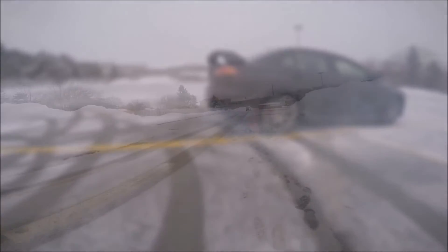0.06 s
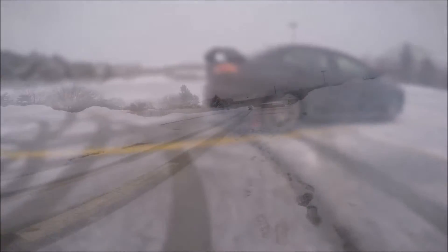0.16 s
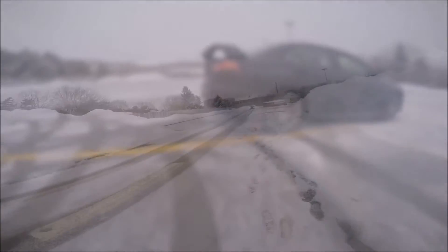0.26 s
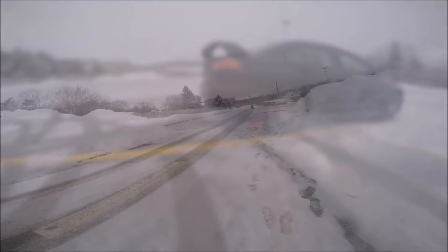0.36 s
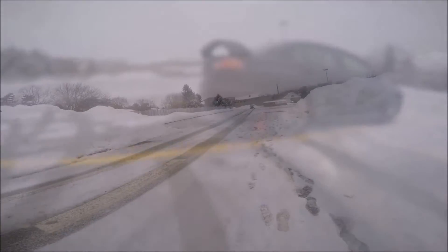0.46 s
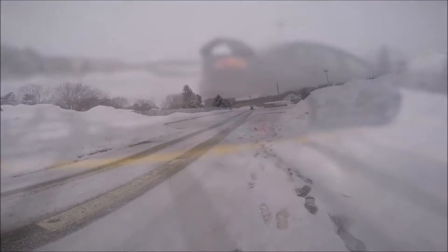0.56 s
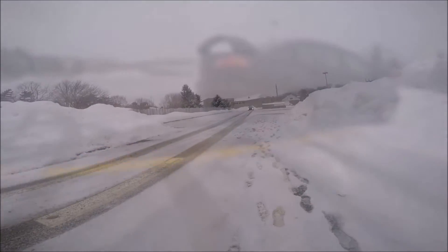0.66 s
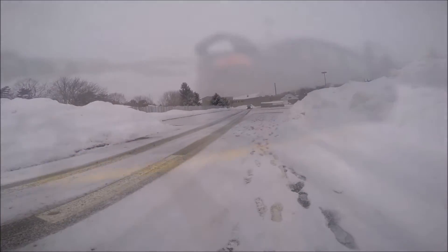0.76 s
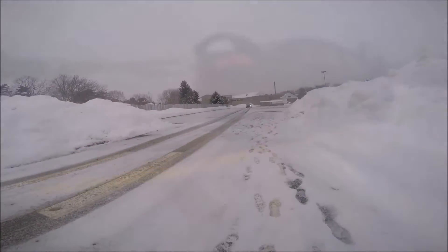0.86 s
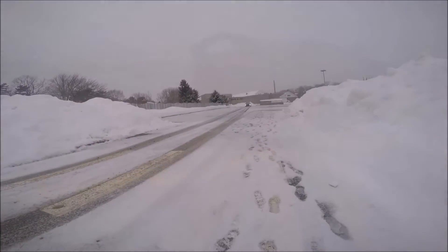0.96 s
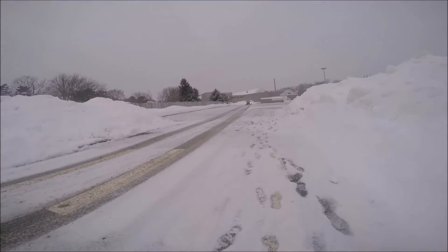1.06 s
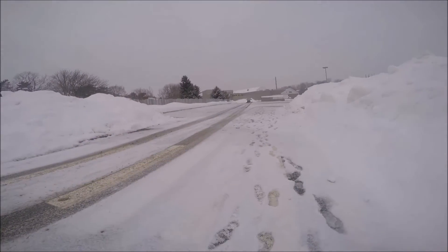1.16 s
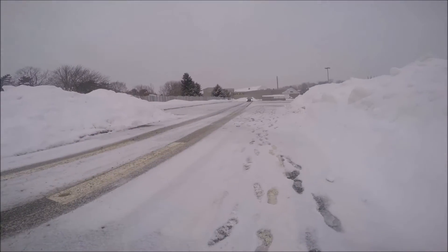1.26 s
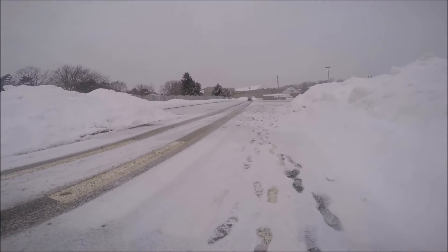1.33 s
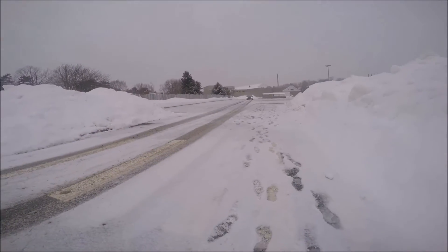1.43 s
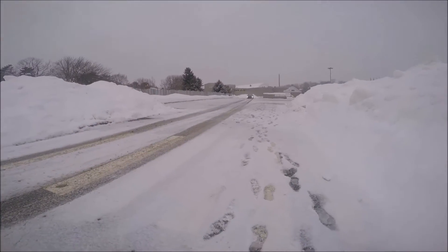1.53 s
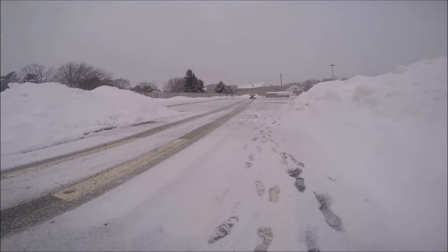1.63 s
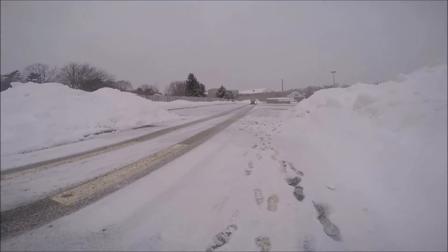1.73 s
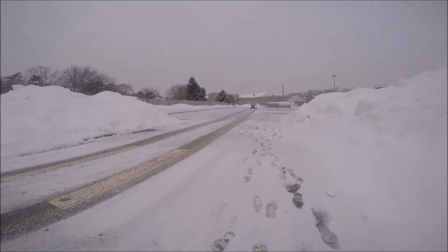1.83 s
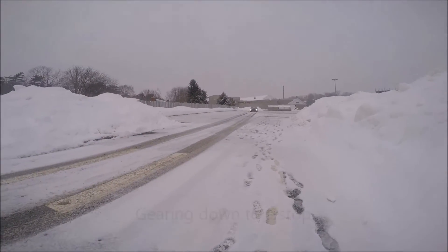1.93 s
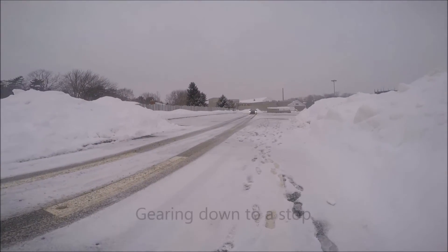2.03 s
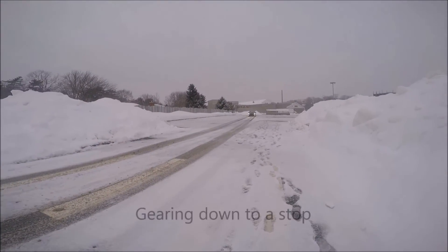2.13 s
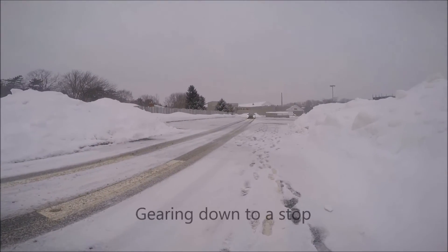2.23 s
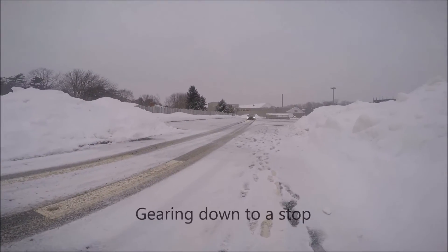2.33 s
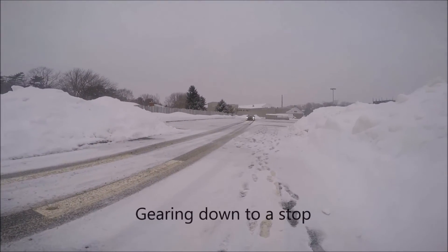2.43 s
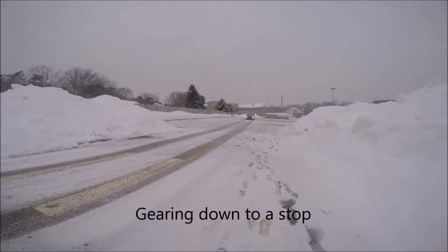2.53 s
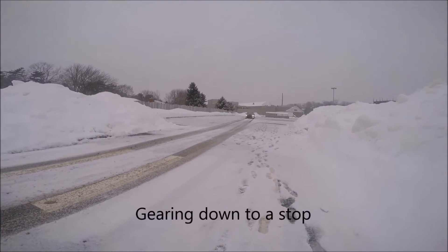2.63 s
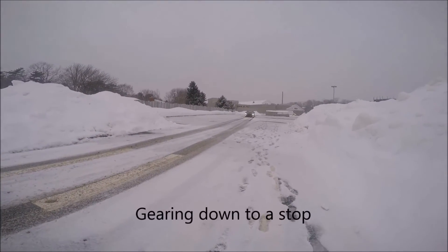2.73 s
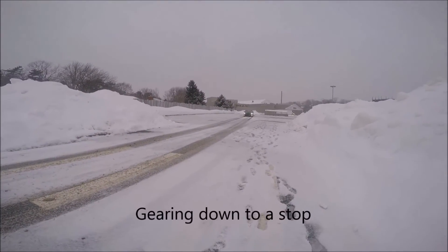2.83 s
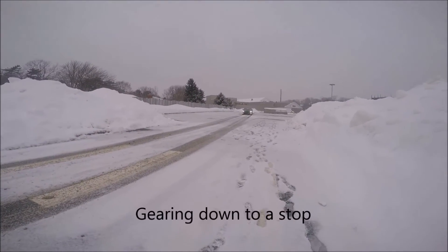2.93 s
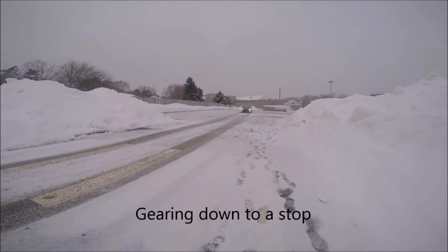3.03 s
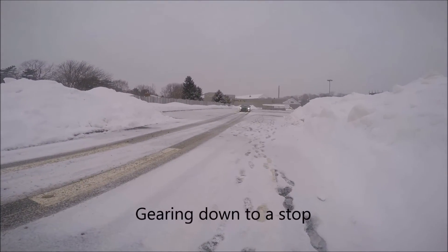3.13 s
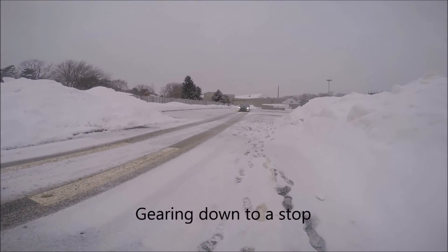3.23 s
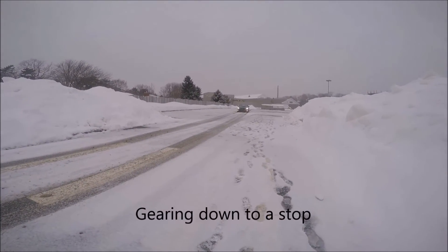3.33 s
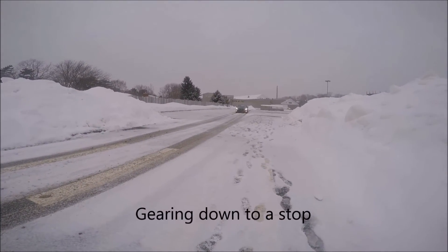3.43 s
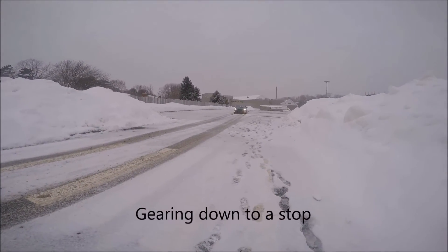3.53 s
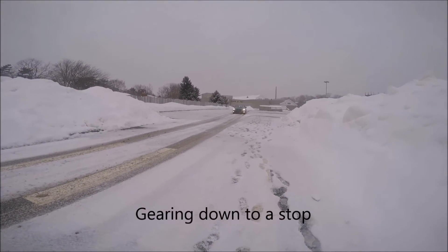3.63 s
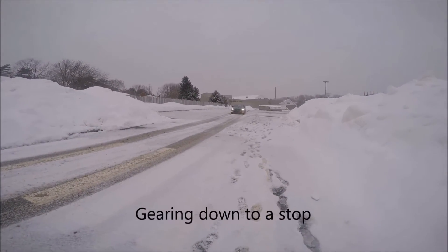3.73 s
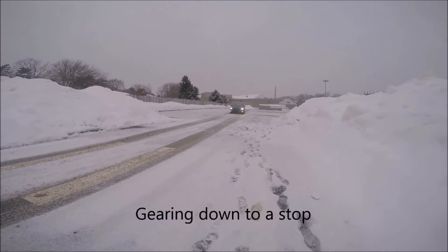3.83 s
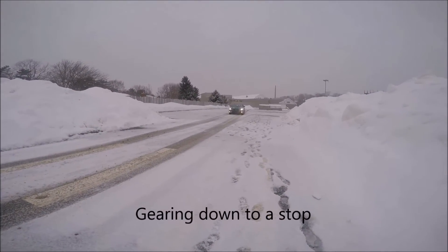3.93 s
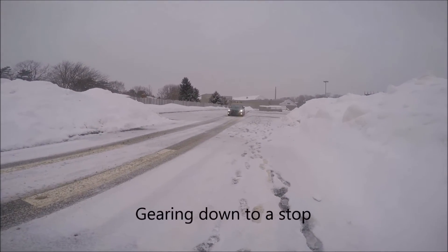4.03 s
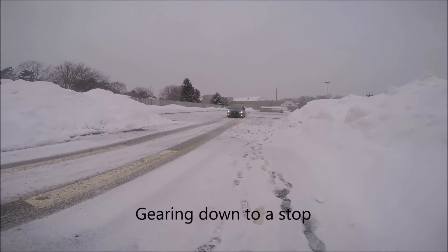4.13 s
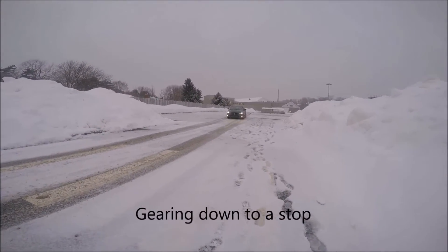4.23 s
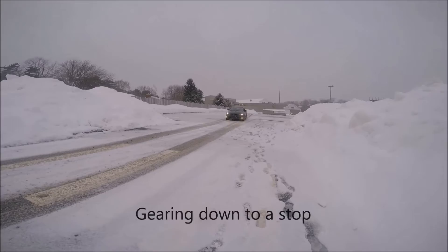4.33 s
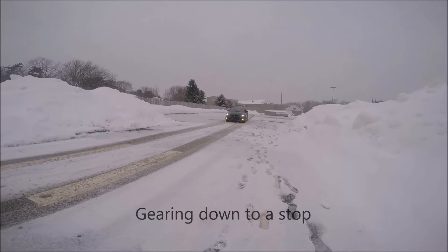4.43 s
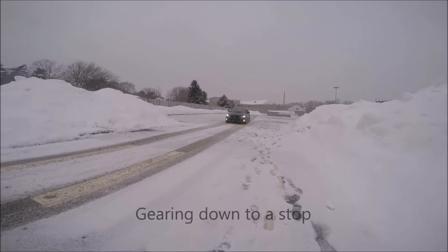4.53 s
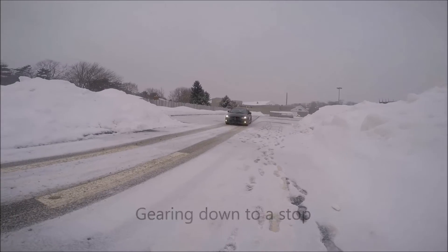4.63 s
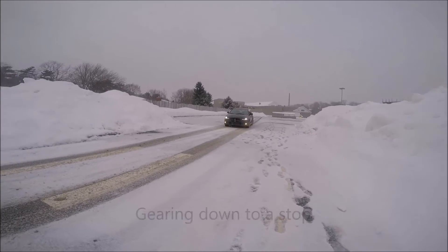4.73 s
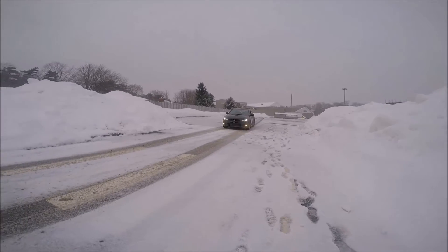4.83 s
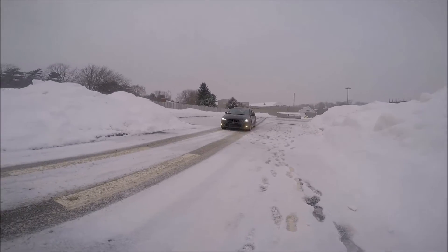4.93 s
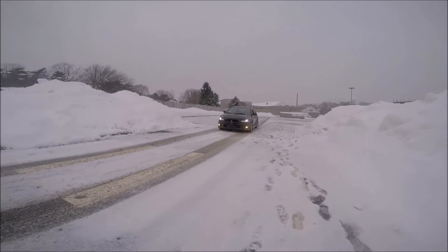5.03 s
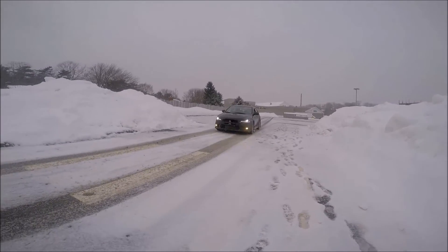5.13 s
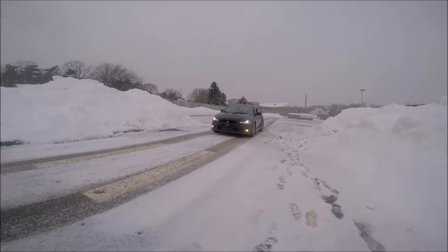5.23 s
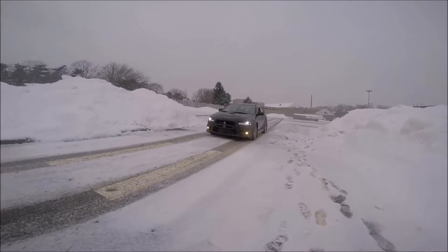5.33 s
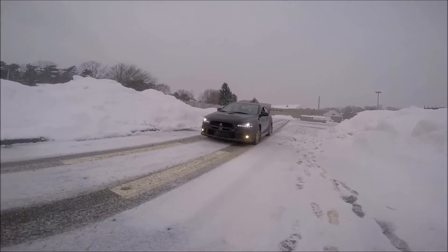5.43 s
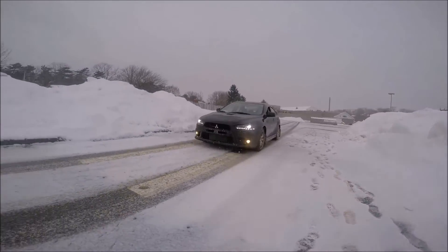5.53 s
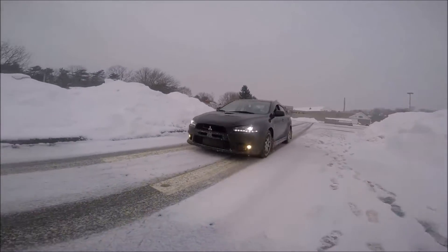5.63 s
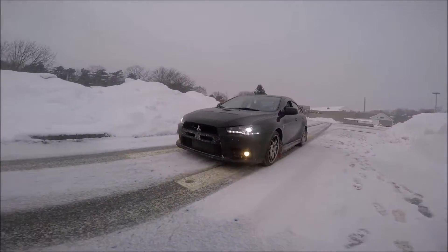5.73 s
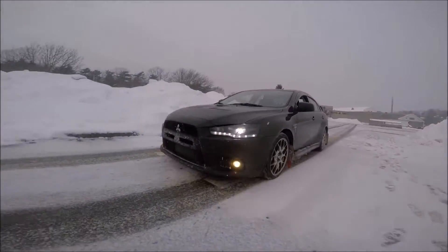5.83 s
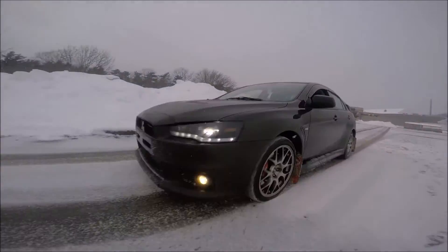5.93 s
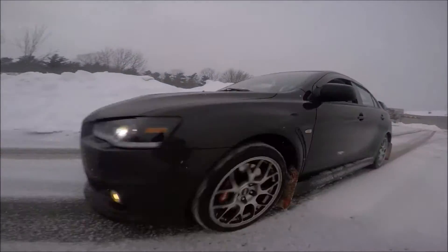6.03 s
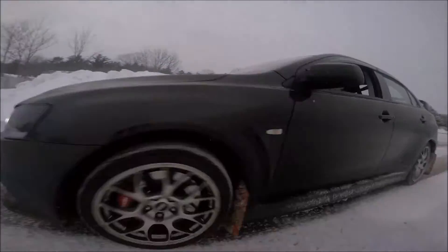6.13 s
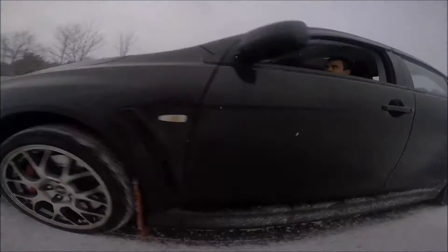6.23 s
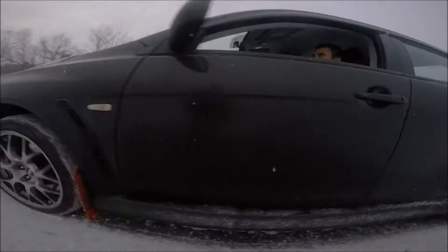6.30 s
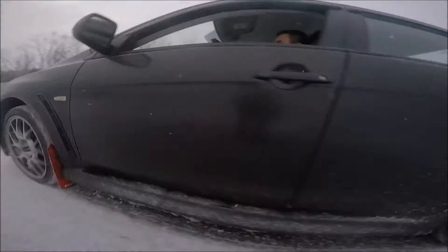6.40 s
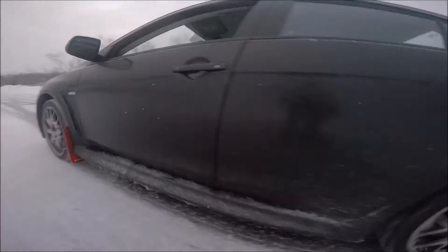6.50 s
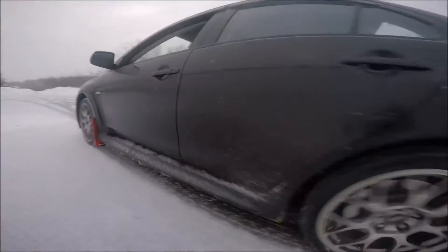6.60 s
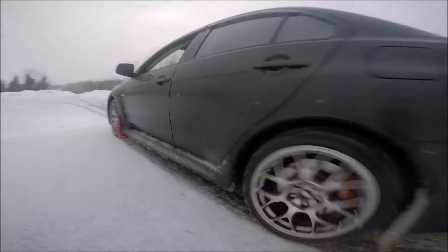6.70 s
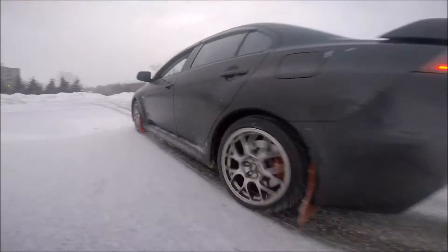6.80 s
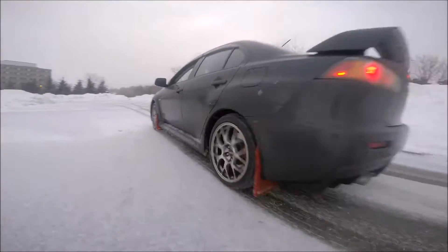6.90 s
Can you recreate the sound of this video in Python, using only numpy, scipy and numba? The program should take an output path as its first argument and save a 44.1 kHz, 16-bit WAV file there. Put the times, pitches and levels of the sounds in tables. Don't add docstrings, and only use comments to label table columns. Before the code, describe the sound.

From 0 to 1.08 s a four-cylinder car booms around a snowy lot, its low, lumpy exhaust rising and dipping while wind rumbles against the camera housing, with scattered dry ticks and a soft thump just before the cut. The next scene is quieter: distant exhaust drops in pitch until about 1.8 s amid clustered ice clicks, dull knocks and wind thumps. Revs climb from 2.4 s to a ringing peak near 3, then fall to a steady low boom until 4.4. A sharper blip peaks around 4.7 s, with strong wind thumps to 5.2, then the pitch descends. Slush and airy hiss swell from 4.5 s, strongest around 5.8-6.4 as the car passes close. A firm housing knock lands at 6.2 s; tyre noise then fades while deep exhaust slows and grows lumpier, with small ringing ticks near 6.8 s.

```python
import sys
import numpy as np
from scipy import signal
from scipy.io import wavfile
from scipy.ndimage import uniform_filter1d
from numba import njit

SR = 44100
rng = np.random.default_rng(int(sys.argv[2]) if len(sys.argv) > 2 else 0)


def log_audio(samples):
    frames = np.atleast_2d(samples).T
    limited = np.clip(frames, -1, 1)
    pcm = np.round(limited * 32767).astype(np.int16)
    wavfile.write(sys.argv[1], SR, pcm)


def volts(x):
    e = np.asarray(x, float) / 20
    return 10 ** e


N = 306936
TIME = np.arange(N) / SR

# (time [s], gust level [dB], sharpness [dB/octave])
GUSTS = [(0, -24.5, 3.5), (.35, -25.5, 1.5), (.45, -18.5, 1), (.55, -23.5, 2.5), (.88, -24, 0),
         (.93, -18, 1), (1.0, -22.5, 2), (1.05, -16, 1), (1.075, -24, 1.5), (1.09, -26.5, -8),
         (1.17, -28.5, -2), (1.36, -29, 6), (1.43, -33, 1.5), (1.48, -17, -0.5), (1.59, -31.5, 2.5),
         (1.62, -22, 1.5), (1.72, -24.5, 0.5), (1.78, -17, -0.5), (1.82, -27, -1), (1.87, -26.5, 0.5),
         (2.04, -33.5, 2.5), (2.11, -20.5, 1.5), (2.17, -31, -2), (2.21, -24.5, 1), (2.29, -31.5, 0.5),
         (2.37, -27.5, -2), (2.79, -32, 2), (2.9, -23.5, 0), (2.95, -33, -3), (3.0, -22, -3.5),
         (3.11, -35, 3), (3.23, -24, -2), (3.27, -36, 6), (3.32, -22.5, 2), (3.52, -19, 0),
         (3.86, -30, 2.5), (3.9, -40, 1), (3.95, -25, 4.5), (4.03, -26.5, -2), (4.1, -20, 6),
         (4.13, -27.5, 2.5), (4.6, -23, 0.5), (4.63, -32.5, 1), (4.76, -18, 1), (4.81, -22.5, 6),
         (4.84, -17, 4), (4.89, -29, 2), (4.94, -31, 1), (5.05, -19.5, 2.5), (5.12, -38, -9),
         (5.18, -20, 3), (5.26, -35, 1), (5.3, -23, 0), (5.36, -37, 1), (5.41, -33, 1), (5.44, -39, 11),
         (5.59, -30, 10), (5.65, -42, 5), (5.72, -35, 3), (6.02, -48, -8), (6.07, -43, 1), (6.59, -49, -6),
         (6.66, -22.5, 5), (6.82, -30, 3), (6.9, -39, 9)]
# (frequency [Hz], density [dB/Hz])
WIND_COLOUR = [(12, -2), (25, 5.5), (45, 1), (70, -1.5), (110, -10), (180, -20), (300, -26), (500, -35.5)]
# (time [s], peak [dB], pitch [Hz])
THUMPS = [
    (1.039, -2.5, 68.6),
    (1.489, -13, 70),
    (1.609, -12, 69),
    (1.759, -17, 70),
    (4.764, -5, 69),
    (4.829, -13, 71.4),
    (4.849, -12, 69.5),
    (5.027, -1, 70),
    (5.153, -5, 71.5),
    (5.188, -4.5, 71),
]
# (time [s], peak [dB], centre [Hz], width/centre [ratio], decay [ms])
TICKS = [(.2164, -42, 8850, .5, 1.1), (.2573, -26, 3000, 0.24, 1.3), (.2578, -28, 8860, 1.5, 1.1),
         (.3152, -27, 10000, 1.4, 1.2), (.316, -26.5, 5000, .5, 2.2), (.4429, -28.5, 4400, .5, 2.5),
         (.4883, -31, 3060, 0.36, 1.4), (.59, -33.5, 4700, 0.65, 36), (1.0763, -31.5, 4850, 2.2, 1.1),
         (1.1528, -29.5, 2400, 0.87, 3), (1.4301, -34.5, 3000, 1.2, 2.8), (1.4573, -22.5, 2520, 0.3, 2.1),
         (1.49, -41.5, 3000, 0.63, 9.5), (1.5614, -33, 2400, 0.53, 2.1), (1.6003, -32, 3000, .7, 1.8),
         (1.731, -20.5, 8400, 1.1, 1.2), (1.731, -22.5, 2700, 1.2, 1.8), (1.78, -31.5, 3200, 0.38, 33),
         (1.79, -24.5, 1400, 0.53, 30), (1.8, -34, 5300, 0.36, 22), (1.752, -37, 3300, .3, 6.5),
         (1.8008, -25.5, 3050, 0.68, 2.2), (1.8287, -29, 2600, 1.1, 3.3), (2.9382, -48, 11800, 0.7, 0.62),
         (3.043, -32, 6000, 2.4, 1.6), (3.324, -38, 11000, .4, 0.8), (3.3233, -36.5, 5700, 0.45, 1.2),
         (3.4171, -24.5, 4640, 0.45, 1.7), (3.4171, -32, 12000, .9, 1), (4.585, -38.5, 11800, 1.2, 1),
         (6.4438, -26, 2010, 1.1, 3.4), (6.478, -26, 2900, .2, 3), (6.785, -40, 2750, .06, 22),
         (6.807, -31.5, 2740, 0.077, 13), (6.785, -33, 1744, 0.068, 25)]
# (time [s], peak [dB], centre [Hz], width/centre [ratio], decay [ms])
KNOCKS = [(0.434, -18.5, 710, 0.4, 4.4), (0.835, -24, 770, 0.4, 4.4), (1.154, -25.5, 799, 0.71, 3.3),
          (1.459, -17.5, 820, 0.63, 3.4), (1.562, -24.5, 970, 0.33, 3.0), (1.597, -27.5, 816, 0.35, 2.7),
          (1.8, -23, 1020, 0.34, 2.4), (1.829, -23, 1000, 0.4, 3.0), (3.257, -37, 999, 0.45, 3.0),
          (6.205, -11, 940, 0.44, 3.3), (6.784, -26, 1060, 0.35, 2.04)]
# (time [s], 300 Hz [dB], 900 Hz [dB], 2.3 kHz [dB], 3.6 kHz [dB])
TYRE_LEVELS = [(0.0, -28, -36.5, -63, -62), (0.15, -30, -34, -61, -56), (0.31, -27.5, -34, -62, -59.5),
               (0.5, -31, -40.5, -64, -56.5), (0.73, -33.5, -41.5, -60, -62),
               (0.91, -32.5, -34.5, -65, -62), (1.0, -28.5, -33.5, -55, -52.5),
               (1.12, -38, -40.5, -59, -55), (1.25, -40.5, -42.5, -57, -65), (1.45, -46, -40.5, -53.5, -67),
               (1.7, -39.5, -39.5, -51.5, -61), (1.93, -35.5, -39.5, -46.5, -66),
               (2.18, -37, -39.5, -50.5, -65), (2.35, -40.5, -42.5, -55.5, -65),
               (2.57, -37, -43, -57.5, -75), (2.72, -37.5, -42.5, -54, -65),
               (2.95, -38.5, -41.5, -51.5, -65), (3.22, -41, -43, -54.5, -70), (3.45, -34.5, -39, -58, -67),
               (3.61, -33, -40.5, -61, -73), (3.98, -39, -40.5, -59, -71), (4.28, -36, -39, -58, -70),
               (4.52, -30.5, -36.5, -53, -74), (4.61, -26.5, -29, -49, -67), (4.73, -30, -32, -45, -64),
               (4.82, -38, -29, -43, -57), (5.02, -31.5, -29, -43, -69), (5.48, -31.5, -28.5, -37.5, -58),
               (5.62, -33.5, -26.5, -35, -51.5), (5.83, -33.5, -24.5, -33.5, -46),
               (6.1, -31.5, -26, -34, -45.5), (6.23, -27, -27, -32.5, -41), (6.31, -28, -27, -32.5, -40.5),
               (6.43, -32, -30.5, -35, -45.5), (6.54, -34, -35, -44, -52.5), (6.66, -40, -37.5, -43.5, -50),
               (6.79, -41, -38.5, -50, -59.5), (6.93, -44, -42, -53.5, -61)]
# (time [s], 5 kHz [dB], 9 kHz [dB], 14 kHz [dB])
HISS_LEVELS = [(0.0, -56, -69, -69), (0.27, -56, -68, -66.5), (0.46, -55.5, -64.5, -69),
               (0.63, -58, -65.5, -62), (0.93, -55.5, -68, -72), (1.06, -58, -70, -76.5),
               (1.39, -59.5, -72, -72.5), (1.72, -55, -70, -79), (1.91, -52, -65, -76.5),
               (2.2, -52.5, -72, -87), (2.35, -59.5, -71, -78.5), (2.61, -67, -70, -73),
               (2.76, -60, -74, -77.5), (2.91, -59.5, -71, -74.5), (3.42, -64, -71, -79.5),
               (3.84, -62.5, -71.5, -78), (4.46, -60.5, -69, -78.5), (4.55, -54, -58, -72.5),
               (4.67, -50, -58, -77.5), (4.77, -47.5, -55.5, -81), (4.9, -48, -56.5, -70),
               (5.25, -48, -56, -72), (5.79, -43.5, -55, -60), (6.02, -43, -56, -59.5),
               (6.23, -43, -50, -60.5), (6.31, -44, -51, -62.5), (6.44, -44, -55.5, -62),
               (6.6, -51, -63, -68), (6.79, -53.5, -65, -68), (6.93, -62, -71, -87.5)]
# (frequency [Hz], density [dB/Hz])
ROAR_COLOUR = [(100, -29), (170, -0.5), (262, -2), (317, 2.5), (569, -11.5), (948, -10), (1380, -15.5),
               (1910, -21), (2300, -19), (3230, -29), (5280, -23), (7010, -42), (12800, -46.5),
               (15500, -46)]
# (low edge [Hz], high edge [Hz])
ZONES_HZ = [(200, 450), (550, 1400), (1700, 2900), (3200, 4100), (4400, 6200), (7000, 10500),
            (13000, 15200)]
# (time [s], firing rate [Hz])
REVS = [(0, 55), (.14, 63.5), (.3, 73), (.42, 66), (.5, 56), (.69, 65), (.82, 76), (.95, 79), (1.085, 82),
        (1.095, 100), (1.33, 98), (1.5, 89), (1.69, 81.5), (1.82, 75.5), (2.03, 77), (2.3, 78),
        (2.45, 83.5), (2.56, 99), (2.64, 110.5), (2.75, 126.5), (2.85, 130), (3.02, 131.5), (3.11, 125),
        (3.2, 110.5), (3.3, 101.5), (3.46, 107), (3.58, 103.5), (3.7, 104.5), (3.87, 100.5), (4.3, 98),
        (4.42, 96.5), (4.56, 120.5), (4.61, 135), (4.67, 147.5), (4.74, 150.5), (4.85, 143), (5.0, 137),
        (5.16, 135.5), (5.29, 130.5), (5.45, 119), (5.53, 111), (5.61, 106), (5.7, 105.4), (5.8, 106.8),
        (5.95, 107), (6.02, 103.8), (6.19, 96), (6.41, 84.2), (6.64, 73.6), (6.73, 71.4), (6.83, 68.5),
        (6.96, 65.5)]
# (time [s], boom [dB], lumpiness [dB])
LOT_LEVELS = [(0, -17, 2.5), (.1, -13.5, -2.5), (.28, -19, 1), (.38, -19.5, 2), (.46, -28.5, 1.5),
              (.53, -16.5, -1), (.69, -12.5, -2.5), (.8, -20, 2.5), (.9, -17.5, 5), (.96, -20, 3),
              (1.0, -29, 1.5), (1.08, -26, -2)]
# (multiple of crank-cycle rate [ratio], level [dB])
LUMPS_DB = [(1, -10), (2, -6), (4, -10), (5, -19), (6, -26), (7, -27), (8, -24), (9, -26), (11, -28),
            (13, -27), (14, -28)]
# (time [s], boom [dB], overtones [dB])
ROAD_LEVELS = [(1.1, -37, 9), (1.31, -34, 2), (1.51, -26, 7), (1.67, -28, 2.5), (1.8, -38, 1),
               (2.01, -24.5, 5), (2.3, -28.5, 4), (2.36, -43, 11), (2.45, -38, 10), (2.56, -23, 4),
               (2.64, -20.5, 8), (2.7, -33, 10), (2.85, -32.5, 10.5), (2.98, -32, 11), (3.1, -28, 5.5),
               (3.2, -26.5, 11), (3.29, -20.5, -1), (3.34, -25, 5), (3.44, -15, -1.5), (3.56, -19.5, 1.5),
               (3.7, -16.5, 0.5), (3.9, -16, -1), (4.2, -15.5, 0), (4.36, -14, -1), (4.43, -19, 6),
               (4.56, -15, 4.5), (4.61, -22.5, 7.5), (4.68, -26, 12), (4.83, -22, 5.5), (5.0, -26.5, 10.5),
               (5.14, -22, 9.5), (5.22, -16.5, 8), (5.3, -14.5, -1), (5.45, -11.5, 1), (5.56, -12, 1),
               (5.65, -10.5, 0.5), (5.82, -11, 7), (5.96, -10.5, 4.5), (6.2, -10.5, 5), (6.41, -10, -0.5),
               (6.64, -11.5, 0), (6.705, -20, 6), (6.735, -8, -8), (6.77, -13.5, -4), (6.8, -11.5, -5.5),
               (6.84, -16, -8.5), (6.93, -11, -7.5)]
# (multiple of firing rate [ratio], level [dB])
ORDERS_DB = [(.5, -34.5), (1.5, -28), (2, -25), (2.5, -38), (3, -24.5), (3.5, -30), (4, -30), (4.5, -31.5),
             (5, -34), (5.5, -40), (6, -30.5), (7, -35), (8, -35.5), (9, -33)]
# (frequency [Hz], width [Hz], gain [dB])
PIPE = [(315, 27, 3), (455, 31.5, 5), (617, 23, 2.5)]
# (centre time [s], length [s])
GAPS = [(.351, 0.031), (0.899, 0.024), (2.415, 0.058), (2.48, 0.049), (2.80, 0.014), (2.868, .02),
        (3.975, 0.027), (4.173, .015), (4.445, .015), (5.465, 0.016), (5.539, .015)]


@njit
def svf(x, hz, width_hz):
    y, band_state, low_state = np.empty(len(x)), 0., 0.
    g, k = np.tan(np.pi * hz / SR), width_hz / hz
    for i in range(len(x)):
        v = (band_state + g * (x[i] - low_state)) / (1 + g * (g + k))
        band_state = 2 * v - band_state
        low_state = low_state + 2 * g * v
        y[i] = k * v
    return y


def columns(table):
    time_s, *rest = np.transpose(table)
    return [np.interp(TIME, time_s, c) for c in rest]


def colour(table, hz):
    table_hz, db = np.transpose(table)
    return np.interp(np.log(hz), np.log(table_hz), db) + 10 * np.log10(hz)


def unit(x):
    return x / np.sqrt(np.mean(x ** 2))


def walk(rate_hz):
    hold = int(SR / rate_hz)
    steps = np.repeat(rng.standard_normal(N // hold + 1), hold)
    return unit(uniform_filter1d(uniform_filter1d(steps, hold), hold)[:N])


def band(hz, share):
    once = svf(rng.standard_normal(N), hz, hz * share)
    return unit(svf(once, hz, hz * share))


def add(out, time_s, grain):
    i = int(time_s * SR)
    out[i:i + len(grain)] += grain[:N - i]


def wind():
    gust_db, sharp_db = columns(GUSTS)
    buffet, out = walk(16), 0
    for hz in 14 * 2 ** (np.arange(16) / 3):
        reach_db = np.clip(sharp_db, -8, 3) * max(np.log2(hz / 45), 0)
        level_db = colour(WIND_COLOUR, hz) + reach_db + 1.9 * buffet + 1.2 * walk(9)
        out = out + volts(level_db) * band(hz, 1 / 3)
    return volts(gust_db - 23.5) * out


def thumps():
    out = np.zeros(N)
    for time_s, db, hz in THUMPS:
        turn = np.arange(int(4 * SR / hz)) * hz / SR
        envelope = np.sqrt(turn) * np.exp(-turn / 0.39)
        add(out, time_s, 3.14 * volts(db) * np.sin(2 * np.pi * turn) * envelope)
    return out


def ticks(table):
    out, t = np.zeros(N), np.arange(4096) / SR
    for time_s, db, hz, share, ms in table:
        attack = np.minimum(t / (0.00022 * ms), 1)
        burst = rng.standard_normal(len(t)) * np.exp(-t / ms * 1000) * attack
        width_hz = share * hz
        grain = svf(svf(burst, 1. * hz, width_hz), 1. * hz, width_hz)
        add(out, time_s, volts(db) * grain / np.abs(grain).max())
    return out


def roar(phase):
    centres_hz = 180 * 2 ** (np.arange(27) / 4)
    gains = volts(colour(ROAR_COLOUR, centres_hz))
    usual_db = []
    for lo, hi in ZONES_HZ:
        inside = (centres_hz > lo) & (centres_hz < hi)
        usual_db.append(10 * np.log10(np.sum(gains[inside] ** 2)))
    lifts_db = np.array(columns(TYRE_LEVELS) + columns(HISS_LEVELS)) - np.array(usual_db)[:, None]
    edges, swell, out = np.log(np.ravel(ZONES_HZ)), walk(9), 0
    for hz, gain in zip(centres_hz, gains):
        weights = [np.interp(np.log(hz), edges, np.repeat(row, 2)) for row in np.eye(len(usual_db))]
        level_db = weights @ lifts_db + 1.38 * swell + 1.4 * walk(14)
        out = out + gain * volts(level_db) * band(hz, 0.25)
    puffed = volts(-0.5) * (1 + 0.14 * np.sin(phase)) * out
    return signal.sosfilt(signal.ellip(8, .2, 50, 15350, fs=SR, output="sos"), puffed)


def lot_exhaust():
    (hz,), (boom_db, lump_db) = columns(REVS), columns(LOT_LEVELS)
    cycle = np.pi + 2 * np.pi * np.cumsum(hz * (1 + .012 * walk(15))) / (3 * SR)
    out = volts(1.2 * walk(20.5)) * np.cos(3 * cycle)
    for k, db in LUMPS_DB:
        level_db = db + lump_db + 2.56 * walk(12)
        out = out + volts(level_db) * np.cos(k * cycle + 0.075 * k * walk(8))
    return np.sqrt(2) * volts(boom_db) * out


def road_exhaust():
    (hz,), (boom_db, over_db) = columns(REVS), columns(ROAD_LEVELS)
    phase = 2 * np.pi * np.cumsum(hz * (1 + .002 * walk(25.04))) / SR
    out = np.sin(phase) * volts(.5 * walk(30))
    for k, db in ORDERS_DB:
        ring_db = sum(g / (1 + (2 * (k * hz - f) / w) ** 2) for f, w, g in PIPE)
        level_db = db + over_db + ring_db + 3.5 * walk(6)
        out = out + volts(level_db) * np.sin(k * phase + rng.uniform(0, 2 * np.pi))
    return np.sqrt(2) * volts(boom_db) * out, phase


def scene():
    road, phase = road_exhaust()
    to_road = np.clip((TIME - 1.075) / .015, 0, 1)
    car = (1 - to_road) * lot_exhaust() + to_road * road
    mix = wind() + thumps() + ticks(TICKS) + ticks(KNOCKS) + roar(phase) + car
    return mix[None]


def drop_treble(x):
    low = signal.sosfiltfilt(signal.butter(6, 1800, fs=SR, output="sos"), x)
    lost = sum(np.clip(2 - 4 * np.abs(TIME - s) / length_s, 0, 1) for s, length_s in GAPS)
    return low + (x - low) * volts(-12 * lost)


def circuit_whine():
    hz, level_db, end_s = 12617, -73, 6.3
    tone = np.sin(2 * np.pi * hz * TIME) * (TIME < end_s)
    return np.sqrt(2) * volts(level_db + walk(20)) * tone


def low_pass(x):
    return signal.sosfilt(signal.butter(12, 16320, fs=SR, output="sos"), x)


def record(dry):
    dry = signal.sosfilt(signal.butter(2, 12, "high", fs=SR, output="sos"), dry)
    x = drop_treble(dry) + circuit_whine()
    return low_pass(np.tanh(0.69 * x) / 0.73)


dry = scene()
out = record(dry)
log_audio(out)
```